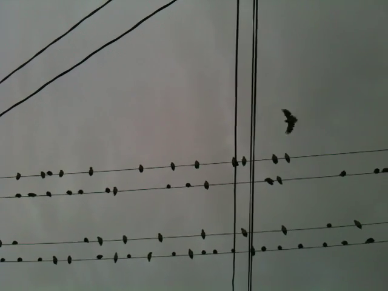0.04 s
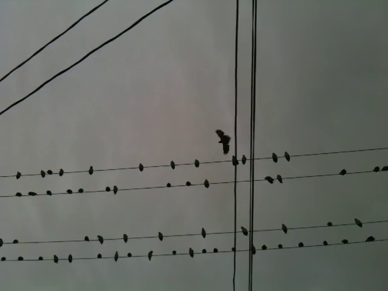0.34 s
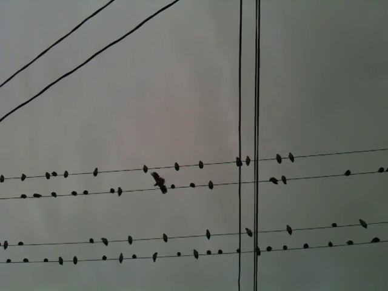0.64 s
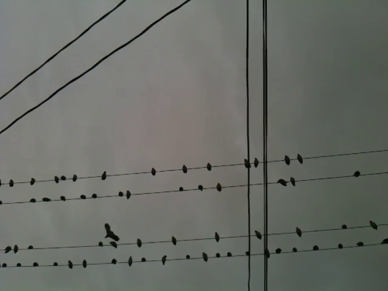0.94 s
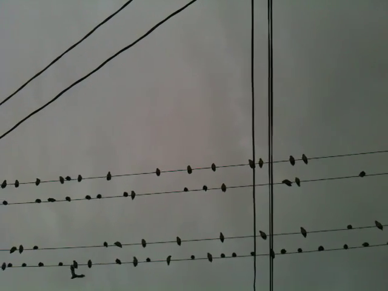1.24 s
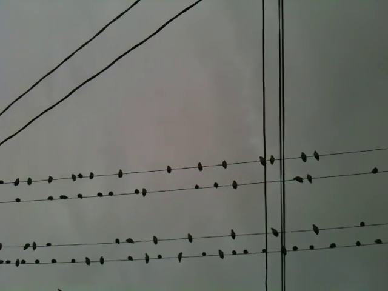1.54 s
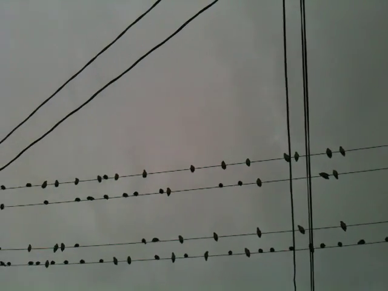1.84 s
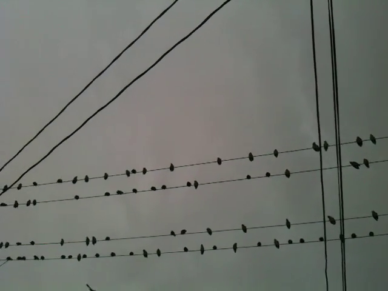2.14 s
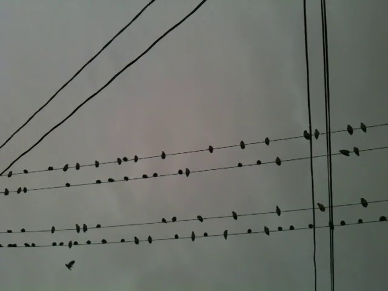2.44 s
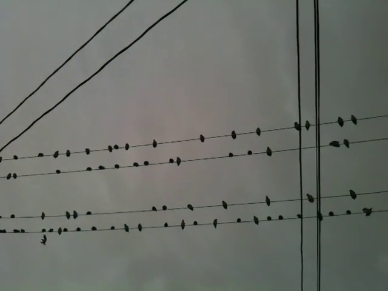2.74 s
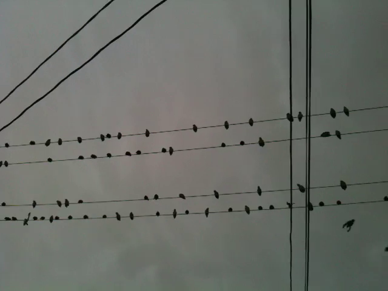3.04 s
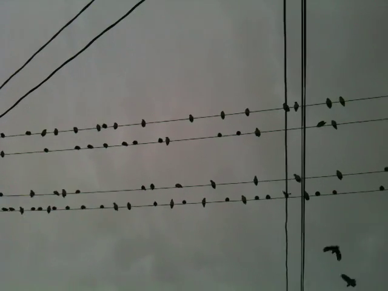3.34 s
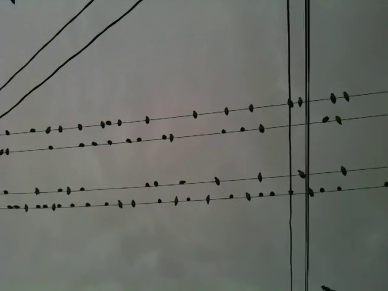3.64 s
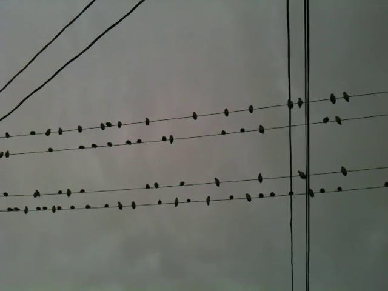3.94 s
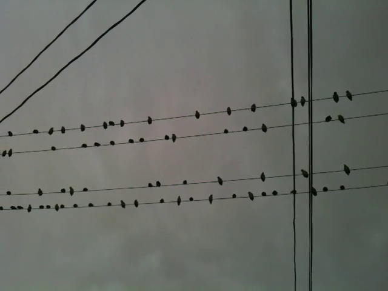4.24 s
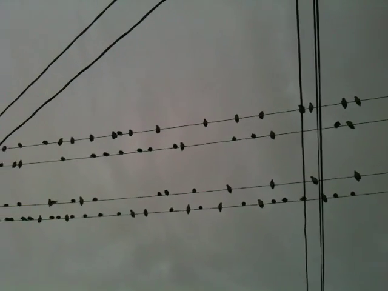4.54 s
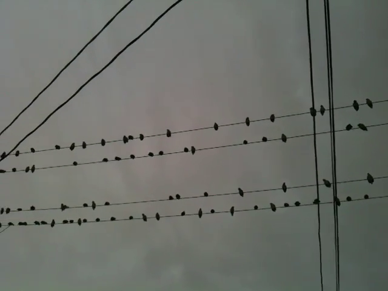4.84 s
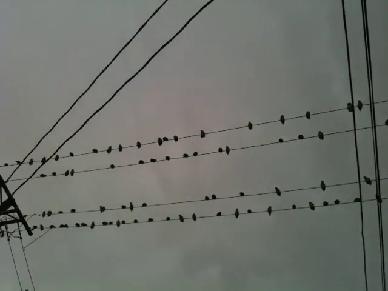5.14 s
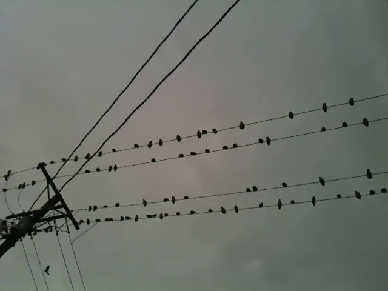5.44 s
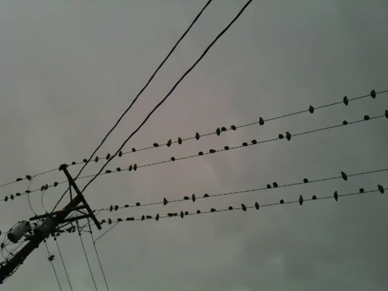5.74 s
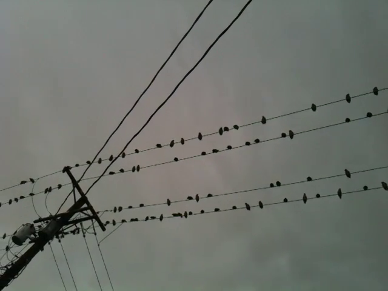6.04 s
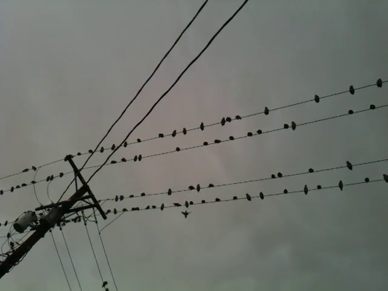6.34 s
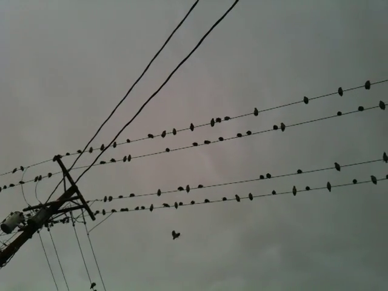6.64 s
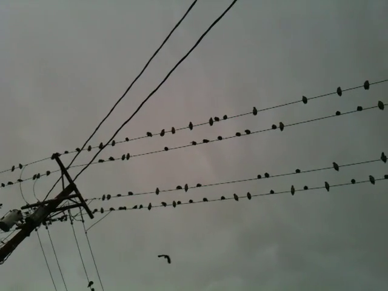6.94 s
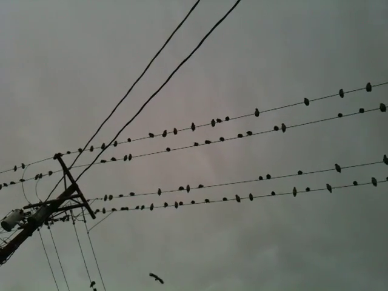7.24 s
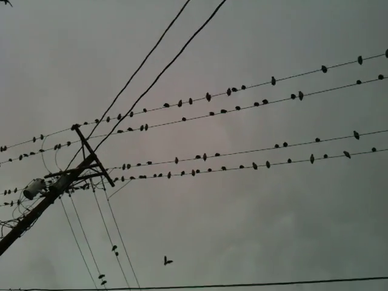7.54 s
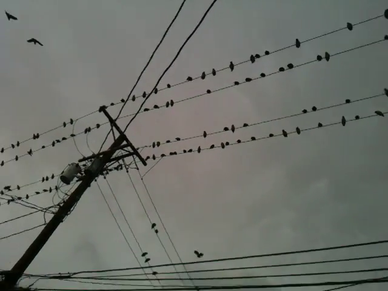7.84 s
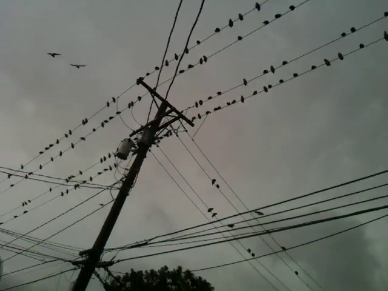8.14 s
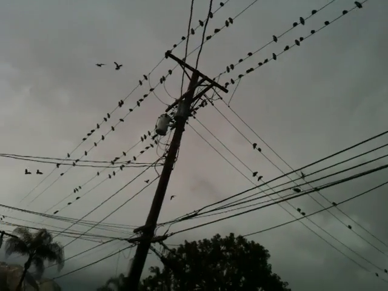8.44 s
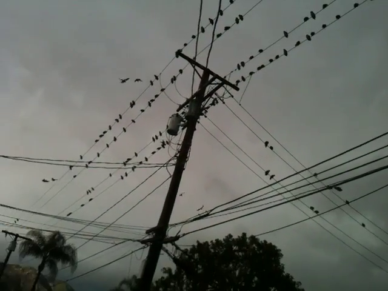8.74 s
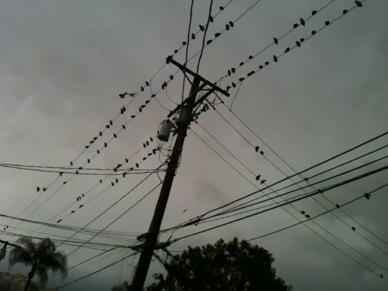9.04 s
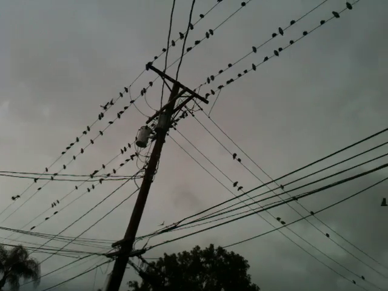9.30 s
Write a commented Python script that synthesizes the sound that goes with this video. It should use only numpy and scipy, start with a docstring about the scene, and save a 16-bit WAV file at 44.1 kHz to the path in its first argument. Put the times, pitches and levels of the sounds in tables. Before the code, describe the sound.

A large flock of parrots is already chattering at the start and carries on for the whole ten seconds or so, heard from beneath overhead wires. Dozens of hoarse, distant squawks merge into a din, dotted with tiny chirps, while nearer birds add short whistles, yelps, peeps and squeaks. A falling trill comes at about 0.6 seconds and a quick run of squeaks at 1. From 1.2 to 2.4 seconds the flock grows shriller, with overlapping ragged screeches. More screeches and throaty caws come around 3 seconds and again from 4 to 5.5, with a fast trill near 4.8. The din eases briefly just after 6 seconds, then returns, with scattered whistles and peeps, and further screeches from 8 seconds to the end. The calls echo lightly off house fronts, and far traffic rumbles very faintly underneath.

```python
"""A quiet town street, under overhead wires where a large flock chatters, parrots by their voices.
Dozens of hoarse, distant squawks overlap into a din that grows shriller as the flock gets excited.
Closer to the microphone, single birds screech, caw, whistle, trill and squeak over it: the harsh calls
are a buzzing syrinx mixed with breath, the whistles gliding tones with a few overtones.
House fronts scatter the calls, and far traffic rumbles faintly underneath."""
import sys
import numpy as np
from scipy import signal
from scipy.fft import rfft, irfft, next_fast_len
from scipy.io import wavfile

SR = 44100
rng = np.random.default_rng(int(sys.argv[2]) if len(sys.argv) > 2 else 0)


def unload_audio(sound):
    """Save the sound as a 16-bit wav file, at the path given as the first command line argument."""
    columns = np.transpose(np.atleast_2d(sound))
    # keep every value between -1 and 1, then stretch to whole-number steps
    steps = np.round(np.clip(columns, -1, 1) * 32767)
    wavfile.write(sys.argv[1], SR, steps.astype(np.int16))


N = 422037

# the din's lower voice, which lulls and returns: (time [s], level [dB])
DIN_LEVEL = [(0, -27), (.5, -29), (.8, -29.5), (.96, -31.5), (1.25, -27), (1.8, -28), (2.06, -28),
             (2.25, -29), (2.47, -29.5), (2.75, -28.5), (3.2, -28.5), (3.5, -29.5), (3.8, -30), (4.1, -28),
             (4.37, -27.5), (4.95, -28.5), (5.14, -29.5), (5.5, -27), (5.7, -29), (6.0, -28.5),
             (6.2, -33.5), (6.45, -32), (6.75, -30), (7.2, -27.5), (7.32, -31.5), (7.75, -29), (7.95, -31),
             (8.2, -27.5), (8.5, -31), (8.9, -27.5), (9.1, -31.5), (9.25, -27), (9.57, -28)]
CRY_ARCH, CLIPPED_ARCH = 0.0116, 0.03  # share by which the ends of a note sag in pitch
TOP_HZ = 15700


def flock(count=420):
    """Distant birds squawk at random; when they get excited the din is louder and shriller."""
    # throat and beak colour of the flock: (frequency [Hz], gain [dB])
    colour = [(250, -58), (450, -29.5), (600, -19), (800, -12), (1000, -11), (1250, -4), (1550, -1.5),
              (2100, 1), (2500, -1.5), (2900, -5.5), (4200, -1), (4900, -5), (5700, -14), (7200, -14),
              (10000, -25.5), (15000, -43)]
    din = np.zeros(N + SR)
    for i, (when, span, pitch, nearness, throat, beak) in enumerate(rng.uniform(-1, 1, (count, 6))):
        call = squawk(.16 + .09 * span, 700 * 2 ** (.6 * pitch),
                      jitter=0.0449, warble=.045, rasp=0.74, flutter_db=2.5, arch=.2)
        # each bird stresses its own throat and beak resonances
        throat_hz, beak_hz = 2500 * 2 ** (1.03 * throat), 9500 + 4000 * beak
        call = filtered(call, lambda hz: 1 + 0.79 / (1 + ((hz - throat_hz) / 400) ** 2)
                        + 3.78 / (1 + ((hz - beak_hz) / 450) ** 2))
        s = (i + .5 + .5 * when) / count * (N / SR + .5)
        add(din, s, amp(3.1 * nearness) * call)
    din = din[SR // 2:][:N]  # open in mid-chatter
    din = street(coloured(din, colour), wet_db=-7.5)
    body = filtered(din, lambda hz: 1 / (1 + (hz / 2650) ** 8))
    t = np.arange(N) / SR
    body_db = 0.24 + np.interp(t, *np.transpose(DIN_LEVEL))
    shrill_db = -31 + 0.74 * excitement_db(t)
    return amp(body_db) * unit(body) + amp(shrill_db) * unit(din - body)


def excitement_db(s, usual_db=-28):
    """How far above its usual state the flock is at time s."""
    # the flock's excitement: (time [s], level [dB])
    excitement = [(0.0, -27), (0.67, -31.5), (0.92, -32), (1.03, -26), (1.44, -22), (2.08, -28.5),
                  (2.13, -21.5), (2.42, -30), (2.91, -28), (3.06, -25.5), (3.44, -36), (3.85, -28),
                  (4.1, -31.5), (4.25, -25.5), (4.96, -26.5), (5.14, -32), (5.29, -27), (5.35, -22.5),
                  (5.52, -22), (5.7, -30.5), (5.99, -28), (6.16, -40), (6.45, -32), (6.66, -30.5),
                  (6.69, -34), (6.93, -28), (7.14, -30), (7.36, -34.5), (7.73, -27), (7.94, -36),
                  (8.18, -29), (9.38, -28.5), (9.57, -30)]
    return np.interp(s, *np.transpose(excitement)) - usual_db


def squawk(length, hz, jitter, warble, rasp, flutter_db, arch, cycle_size=512):
    """A buzzing syrinx on an arched, warbling pitch, with a puff of noise in each cycle."""
    size = int(length * SR)
    u = np.linspace(-1, 1, size)
    bend = arch * (rng.uniform(-1, 1) * u - .5 * u * u)  # the pitch rises, then sags
    pitch = hz * np.exp(bend + warble * wobble(110, size) + jitter * wobble(700, size))
    cycles = np.cumsum(pitch) / SR
    # every throat weights and delays its harmonics in its own way
    k = np.arange(cycle_size // 2 + 1)
    harmonics = amp(1.86 * rng.standard_normal(len(k))) * np.exp(2j * np.pi * rng.random(len(k)))
    cycle = irfft(harmonics * (k > 0) * (k * hz < TOP_HZ))
    buzz = np.interp(cycles % 1 * cycle_size, np.arange(cycle_size), cycle)
    air = wobble(SR, size) * np.sin(np.pi * cycles) ** 2
    voice = unit(buzz) + rasp * unit(air)
    return unit(voice * amp(flutter_db * wobble(129.6, size))) * swell(size, edge=0.022)


def whistle(length, pitches, over_db, rough):
    """A note gliding through three pitches, with three overtones; a rough one shakes and throbs."""
    size = int(length * SR)
    glide = np.polyval(np.polyfit([0, .5, 1], pitches, 2), np.linspace(0, 1, size))
    shake = 0.00866 * wobble(47.3, size)
    shake += rough * (0.04 * wobble(109.1, size) + 0.0586 * wobble(603, size))
    phase = 2 * np.pi * np.cumsum(glide * (1 + shake)) / SR
    tone = np.zeros(size)
    for k, db in enumerate([0, over_db, over_db - 7.5, over_db - 22], 1):
        flicker = unit(amp(3 * wobble(50, size)))
        beak = 1 / (1 + (k * glide / 8800) ** 10)  # the beak damps the highest overtones
        tone += amp(db) * flicker * beak * np.sin(k * phase)
    throb_db = 5.5 * np.sqrt(rough) * sine(36.7 + 23 * wobble(26.3, size))
    strength = unit(amp(1.7 * wobble(134.0, size) + throb_db))
    return tone * strength * swell(size, edge=0.0056)


def arched(hz, glide_hz, arch):
    """First, middle and last pitch of a glide whose ends sag."""
    ends = hz * (1 - arch)
    return [ends - glide_hz / 2, hz, ends + glide_hz / 2]


def screeches(stutter_hz=54, stutter_db=2):
    """Near birds force the voice into a ragged stutter; those facing the microphone are brighter."""
    # screeches: (time [s], length [s], pitch [Hz], level [dB], treble [dB, up to about half applied])
    calls = [(0, 0.38, 1126, -47, 1), (0.572, 0.11, 1030, -49, 5), (1.261, 0.29, 1225, -28, -7),
             (1.401, 0.41, 1247, -33.5, -1), (1.579, 0.55, 1104, -33.5, 1.5),
             (1.707, 0.0484, 1204, -37.5, 15), (2.093, 0.1, 1270, -32, -8), (2.117, 0.28, 1178, -33, -3),
             (2.513, 0.28, 1160, -39, -4), (2.883, 0.17, 1180, -38, -8), (3.034, 0.3, 1293, -31, -11),
             (3.522, 0.18, 833, -38.5, -5), (4.143, 0.3, 1183, -30, -15), (4.59, 0.098, 1150, -30, -15),
             (4.601, 0.41, 855, -33.5, -15), (4.808, 0.27, 1213, -29.5, -13),
             (5.305, 0.13, 1074, -25.5, -15), (5.361, 0.19, 1234, -26.5, -9.5), (5.508, 0.15, 1246, -38, 5),
             (5.759, 0.1, 1165, -30.5, -9), (5.905, 0.24, 1133, -42, 3), (6.288, 0.24, 1197, -39.5, -21),
             (7.047, 0.23, 1133, -43, 5), (7.488, 0.16, 1140, -34.5, -10), (7.704, 0.07, 906, -37, -12),
             (8.165, 0.27, 1130, -34, -13), (8.7, 0.21, 1150, -37.5, 1), (8.997, 0.27, 1045, -38, -9),
             (9.168, 0.28, 1090, -36.5, -1)]
    # throat and beak colour: (frequency [Hz], gain [dB])
    colour = [(400, -48), (1200, -8), (2000, -7), (2500, 6), (3100, 5), (4000, -2.5), (5000, 0.5),
              (5700, -9.5), (6500, 3.5), (7800, 2), (9200, -6), (11000, -14.5), (13000, -15.5),
              (15000, -29)]
    treble_share = [(4500, 0.057), (7000, 0.52)]  # (frequency [Hz], share [0-1])
    out = np.zeros(N)
    for s, length, hz, db, treble_db in calls:
        voice = squawk(length, hz, jitter=.036, warble=.075, rasp=.55, flutter_db=2.6, arch=.06)
        effort = amp(-5 * np.linspace(0, 1, len(voice)) ** 4)  # the push slackens toward the end
        stutter = sine(stutter_hz * np.exp(0.33 * wobble(39.8, len(voice))))
        call = coloured(voice * effort * amp(stutter_db * stutter), colour)
        add(out, s, amp(db) * filtered(call, lambda f: amp(treble_db * along(treble_share, f))))
    return out


def caws():
    """Relaxed, lower calls with little breath and clearer harmonics."""
    # throaty caws: (time [s], length [s], pitch [Hz], level [dB])
    calls = [(0.678, 0.074, 643, -39), (2.139, 0.13, 597, -40.5), (3.271, 0.28, 662, -40.5),
             (3.80, 0.23, 517, -47), (4.28, 0.22, 770, -41), (4.409, 0.22, 719, -39),
             (4.947, 0.17, 773, -35), (8.28, 0.2, 497, -47), (8.848, 0.13, 594, -42)]
    # throat and beak colour: (frequency [Hz], gain [dB])
    colour = [(300, -38), (520, -3.5), (900, -8.5), (1500, 6.5), (2200, -7), (3000, -29), (4500, 0),
              (9000, -43)]
    out = np.zeros(N)
    for s, length, hz, db in calls:
        voice = squawk(length, hz, jitter=0.045, warble=0.0322, rasp=0.16, flutter_db=4.5, arch=0.0703)
        add(out, s, amp(db) * coloured(voice, colour))
    return out


def cries():
    """Near birds whistle over the din, each note a slightly arched glide."""
    # cries: (time [s], length [s], pitch [Hz], glide [Hz], level [dB], overtones [dB], roughness [0-1])
    calls = [(0.419, 0.063, 2134, -300, -24.5, -20, 0.77), (0.57, 0.31, 2193, -130, -29, -12, 0.36),
             (1.17, 0.052, 2150, 0, -23.5, -21, 0.1), (1.485, 0.084, 2404, -80, -22.5, -8, .5),
             (1.645, 0.056, 2540, 40, -27, -7, 0.22), (1.701, .08, 2564, 120, -31, -3, 0.64),
             (1.793, .04, 2450, -60, -24, -6, 0.6), (1.847, .06, 2510, -350, -25.5, -20, 0.73),
             (1.944, 0.051, 2350, -60, -23, -24, 0.55), (2.725, 0.11, 2424, 62, -27.5, -9, 0.65),
             (2.858, 0.16, 2256, -87, -26.5, -9, 0.76), (3.553, 0.12, 2495, -1, -31.5, -10, 0.13),
             (3.665, 0.044, 1476, -30, -30.5, -18, .1), (3.689, 0.17, 3585, 1051, -33, -26, 0.08),
             (3.782, 0.1, 1410, 0, -33, -18, 0.13), (3.88, 0.06, 2037, 30, -27.5, -14, 0.24),
             (4.02, 0.2, 2510, 7, -32, -22, 0.06), (4.443, .045, 2280, 60, -22.5, -13, 0.4),
             (4.542, 0.071, 1910, -310, -26, -18, 0.65), (4.953, 0.09, 2430, -150, -29, -14, 0.73),
             (5.163, 0.11, 2260, 261, -28, -11, 0), (5.489, 0.2, 2394, 24, -28, -26, 0.34),
             (5.90, 0.14, 2240, -52, -31.5, -1.5, 0.14), (5.952, .06, 1460, -40, -30, -20, 0.1),
             (6.036, 0.13, 2180, -78, -30, -8, 0.15), (6.157, 0.15, 2345, -86, -39, 0, 0.07),
             (6.222, 0.032, 2310, 0, -24, -20, 0), (6.61, 0.17, 2430, 42, -28.5, -11, 0.19),
             (6.848, 0.042, 2100, -170, -23, -19, 0.1), (7.128, 0.034, 1870, -210, -24.5, -7, 0.62),
             (7.308, 0.06, 2310, 38, -26, -25, 0.33), (7.406, 0.06, 2296, 20, -26, -12, 0.4),
             (7.711, 0.065, 2756, -5, -27.5, -24, 0.1), (7.84, 0.13, 2170, 57, -31.5, -11, 0.42),
             (8.165, 0.091, 2260, 26, -28.5, -13, 0.1), (8.746, 0.15, 2205, -86, -32.5, -1, .5),
             (8.905, 0.054, 2050, -50, -28, -10, 0.39)]
    out = np.zeros(N)
    for s, length, hz, glide_hz, db, over_db, rough in calls:
        add(out, s, amp(db) * whistle(length, arched(hz, glide_hz, CRY_ARCH), over_db, rough))
    return out


def trills(sounding_share=0.43):
    """Pulsed calls: a run of syllables whose pitch holds, then bends toward the last."""
    # trills: (time [s], length [s], syllable rate [Hz], first pitch [Hz], last pitch [Hz],
    # level [dB], overtones [dB])
    calls = [(.585, .31, 11.4, 2253, 1877, -26.5, -19), (1.314, .16, 15, 2450, 2580, -36, 1),
             (4.80, .14, 31, 2490, 2450, -25, -13), (6.939, .13, 21, 2880, 2550, -25.5, -24),
             (9.042, .09, 32, 3400, 3150, -31, -16)]
    out = np.zeros(N)
    for s, length, rate, first_hz, last_hz, db, over_db in calls:
        beats = np.arange(0, length, 1 / rate)
        for beat, progress in zip(beats, np.linspace(0, 1, len(beats))):
            hz = first_hz + (last_hz - first_hz) * progress ** 2
            syllable = whistle(sounding_share / rate, arched(hz, 0, CRY_ARCH), over_db, rough=0.26)
            add(out, s + beat, amp(db) * syllable)
    return out


def yelps():
    """Single clipped notes, close by, that stick out of the din."""
    # yelps: (time [s], length [s], pitch [Hz], glide [Hz], level [dB])
    calls = [(1.727, 0.027, 2196, -100, -26), (2.14, .03, 2498, 0, -36), (2.26, .03, 1981, 0, -32),
             (2.498, .03, 2584, -100, -27), (2.725, 0.039, 2196, -5, -27), (3.058, 0.033, 2412, 0, -25),
             (3.645, 0.033, 2110, -150, -30), (3.865, 0.037, 2670, -80, -30),
             (4.214, 0.036, 2283, -150, -26), (4.304, 0.037, 2541, -100, -27), (4.338, 0.029, 1507, 0, -27),
             (4.668, .03, 1550, 0, -30), (4.725, 0.027, 2412, -5, -33), (5.356, 0.027, 2756, 0, -26),
             (5.58, 0.036, 2412, 2, -23.5), (6.54, 0.03, 3430, 300, -30.5), (6.742, 0.026, 2412, 0, -23),
             (7.104, 0.036, 2110, 0, -28), (7.198, 0.02, 2326, 0, -29), (7.498, .028, 2455, 0, -26),
             (8.635, .035, 2455, 0, -29), (8.97, 0.023, 2283, 100, -26), (9.008, 0.036, 1938, 122, -24),
             (9.29, 0.034, 2627, -150, -29)]
    out = np.zeros(N)
    for s, length, hz, glide_hz, db in calls:
        add(out, s, amp(db) * whistle(length, arched(hz, glide_hz, CLIPPED_ARCH), over_db=-15, rough=.2))
    return out


def peeps(fall_hz_per_s=2100):
    """Almost pure notes an octave above the cries, all sinking at the same rate."""
    # thin peeps: (time [s], length [s], pitch [Hz], level [dB])
    calls = [(0.414, 0.053, 4300, -29), (0.505, 0.048, 4080, -26), (1.97, .035, 3700, -26),
             (2.115, 0.039, 3760, -26), (2.346, 0.037, 4470, -27), (2.508, 0.077, 4770, -36),
             (3.016, 0.055, 4070, -26.5), (3.235, 0.06, 3920, -35), (3.89, 0.097, 4110, -34),
             (4.07, 0.028, 4240, -29), (6.608, .035, 4880, -32), (6.833, 0.059, 4280, -35),
             (6.845, 0.068, 4130, -28), (6.903, 0.057, 3890, -29), (7.895, 0.027, 4190, -30),
             (8.348, 0.024, 4310, -27), (8.393, 0.05, 4270, -37), (8.502, 0.031, 6100, -38),
             (8.738, 0.049, 4340, -33), (8.81, 0.03, 4170, -31), (8.93, .032, 4110, -34),
             (9.017, 0.034, 4220, -27), (9.124, 0.025, 3780, -30), (9.338, 0.035, 4177, -28),
             (9.394, 0.025, 4091, -32)]
    out = np.zeros(N)
    for s, length, hz, db in calls:
        fall = fall_hz_per_s * length / 2
        add(out, s, amp(db) * whistle(length, [hz + fall, hz, hz - fall], over_db=-28, rough=0.28))
    return out


def squeaks():
    """Breathy syllables of the birds nearest the microphone; the beak rings on the second harmonic."""
    # sharp squeaks, often in quick runs: (time [s], length [s], pitch [Hz], glide [Hz], level [dB])
    calls = [(0.587, 0.044, 3620, -150, -43.5), (1.007, 0.015, 3470, 598, -31),
             (1.038, 0.012, 3650, 300, -32), (1.054, 0.013, 3620, -500, -36), (1.09, 0.021, 3800, 500, -31),
             (1.116, .016, 3550, -400, -32), (1.13, 0.015, 3600, -700, -31), (1.281, 0.038, 3840, 200, -30),
             (1.406, 0.035, 3830, -200, -32), (1.596, 0.021, 3400, 300, -44),
             (1.647, 0.028, 3840, -300, -35), (2.22, 0.024, 3780, 100, -35), (2.247, 0.03, 3440, 250, -33),
             (2.299, .03, 3540, -200, -35), (2.348, 0.027, 3760, -200, -34), (2.943, 0.03, 3450, -300, -39),
             (3.947, 0.039, 3150, 400, -39), (4.722, 0.044, 3700, 50, -36), (5.57, 0.018, 3850, 0, -38),
             (5.754, 0.04, 3670, -50, -34.5), (6.789, .04, 3620, -80, -36), (7.49, 0.042, 3220, 50, -39),
             (8.668, 0.034, 4040, -150, -37), (8.725, 0.028, 4100, 100, -41), (8.774, .026, 3870, -80, -36),
             (8.822, 0.024, 3730, -50, -38)]
    # beak colour: (frequency [Hz], gain [dB])
    colour = [(300, -60), (1800, -14), (3800, 0), (5500, -7), (6500, -2), (8300, -1.5), (11000, -5),
              (15000, -19)]
    out = np.zeros(N)
    for s, length, hz, glide_hz, db in calls:
        note = whistle(length, arched(hz, glide_hz, CLIPPED_ARCH), over_db=4.5, rough=0.265)
        air = amp(-2) * wobble(SR, len(note)) * swell(len(note), edge=0.005)
        add(out, s, amp(db) * coloured(note + air, colour))
    return out


def chirps(count=130):
    """Short, arched notes from all along the wires, louder when the flock is excited."""
    # beak colour: (frequency [Hz], gain [dB])
    colour = [(1000, -5), (4800, 5.5), (5700, -14), (6600, 0), (8000, 5), (12000, -4)]
    out = np.zeros(N)
    for when, span, pitch, slope, distance in rng.random((count, 5)):
        s = when * N / SR
        pitches = 1450 * 2 ** (1.6 * pitch) * np.array([1 - 0.1027 * slope, 1, .87 + 0.118 * slope])
        db = -33 + 0.39 * excitement_db(s) - 6 * distance - 4 * pitch  # high notes carry less far
        add(out, s, amp(db) * whistle(0.0295 + 0.042 * span, pitches, over_db=-2.5, rough=0.413))
    return filtered(out, lambda hz: amp(along(colour, hz)))


def chips(count=70, length_s=0.0284):
    """Tiny high notes of farther birds flit over the din."""
    out = np.zeros(N)
    for when, pitch, slope, nearness in rng.uniform(-1, 1, (count, 4)):
        s = (when + 1) / 2 * N / SR
        hz = 4137 + 543 * pitch
        pitches = [hz * (.98 - 0.023 * slope), hz, hz * (0.96 + 0.056 * slope)]
        db = -34 + 0.39 * excitement_db(s) + 1.5 * nearness
        add(out, s, amp(db) * whistle(length_s, pitches, over_db=-26, rough=0.062))
    return out


def slurs(count=38, centre_hz=1852, spread_oct=.42, bend_oct=0.1324):
    """Farther birds whistle low notes that bend up or down inside the din."""
    out = np.zeros(N)
    for i, (when, span, pitch, start, end) in enumerate(rng.uniform(-1, 1, (count, 5))):
        s = (i + .5 + .5 * when) / count * N / SR
        bend = bend_oct * np.array([start - .5, 0, end - .5])
        pitches = centre_hz * 2 ** (spread_oct * pitch + bend)
        db = np.interp(s, *np.transpose(DIN_LEVEL)) - 6.5
        add(out, s, amp(db) * whistle(.08 * 2 ** (span / 2), pitches, over_db=-14, rough=0.085))
    return out


def street(x, wet_db, wall_delay_s=.009, size=16384):
    """Direct sound plus a diffuse answer from the house fronts; the top treble dies first."""
    # ring of the street: (frequency [Hz], time to fall 60 dB [s])
    decay = [(300, 0.67), (2000, 1), (5000, 0.99), (12000, 0.48)]
    echo = np.zeros(N)
    fade = np.sin(np.pi * np.arange(size) / size)
    padded = np.pad(x, size)
    for start in range(size // 2, N + size, size // 2):
        # each overlapping stretch gets its own tail, as if from another perch
        hz, t, noise = signal.stft(rng.standard_normal(SR // 2), SR, nperseg=256)
        tail = signal.istft(noise * amp(-60 * t / along(decay, hz)[:, None]), SR, nperseg=256)[1]
        stretch = padded[start:start + size] * fade[:len(padded) - start]
        answer = signal.fftconvolve(stretch, tail / np.linalg.norm(tail))
        add(echo, max(start - size, 0) / SR + wall_delay_s, answer[max(size - start, 0):])
    return x + amp(wet_db) * echo


def town():
    """Faraway traffic with a faint wavering drone."""
    # traffic rumble: (frequency [Hz], gain [dB])
    colour = [(20, -43), (40, -34), (65, -22), (88, -9), (103, -11), (122, 0), (200, -1), (320, -1.5),
              (450, -4), (1000, 1), (4000, -23.5), (15000, -21)]
    drone = sine(170 + 4 * wobble(14, N)) * amp(2.9 * wobble(4.9, N))
    return amp(-52.5) * coloured(rng.standard_normal(N), colour) + amp(-66.5) * drone


def amp(db):
    """Decibels to gain."""
    return 10 ** (np.asarray(db) / 20)


def unit(x):
    """x at rms 1."""
    return x / np.sqrt(np.mean(x ** 2) + 1e-20)


def sine(hz):
    """A sine following a frequency curve."""
    return np.sin(2 * np.pi * np.cumsum(hz) / SR)


def along(points, hz):
    """(Hz, value) points read on a log axis."""
    f, v = np.transpose(points)
    return np.interp(np.log(hz + 1), np.log(f + 1), v)


def wobble(rate, size):
    """A random curve of size samples with rate knots a second."""
    knots = np.random.default_rng(rng.integers(1 << 30)).standard_normal(int(size * rate / SR) + 2)
    return np.interp(np.arange(size) * rate / SR, np.arange(len(knots)), knots)


def filtered(x, response):
    """x through a gain given as a function of frequency."""
    m = next_fast_len(len(x) + 2048)
    return irfft(rfft(x, m) * response(np.fft.rfftfreq(m, 1 / SR)), m)[:len(x)]


def coloured(x, spectrum):
    """x through a (Hz, dB) colour, at rms 1."""
    return unit(filtered(x, lambda hz: amp(along(spectrum, hz))))


def add(track, s, sound):
    """Mix a sound into the track at time s."""
    start = max(round(s * SR), 0)
    room = track[start:start + len(sound)]
    room += sound[:len(room)]


def swell(size, edge):
    """A call's outline: it opens and closes over edge seconds."""
    t = np.arange(size) / SR
    return np.sin(np.pi / 2 * np.clip(np.minimum(t, t[-1] - t) / edge, 0, 1))


def scene():
    """From under the wires, in mono: single birds, the flock behind them and the town."""
    near = screeches() + caws() + cries() + trills() + yelps() + peeps() + squeaks()
    farther = chirps() + chips() + slurs()
    return (street(near + farther, wet_db=-8.0) + flock() + town())[None]


def record(dry):
    """The camera's microphone channel keeps nothing above its band limit."""
    return np.array([filtered(channel, lambda hz: hz < TOP_HZ) for channel in dry])


dry = scene()
out = record(dry)
unload_audio(out)
```